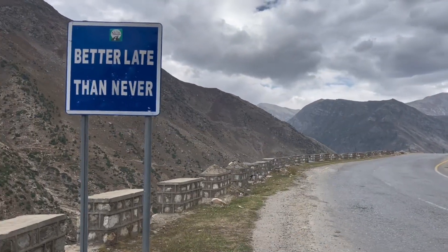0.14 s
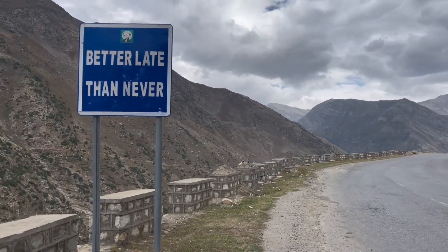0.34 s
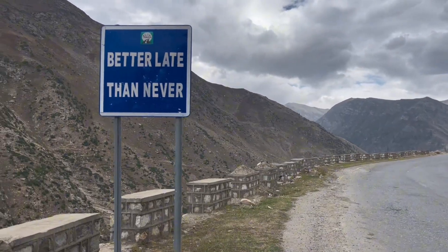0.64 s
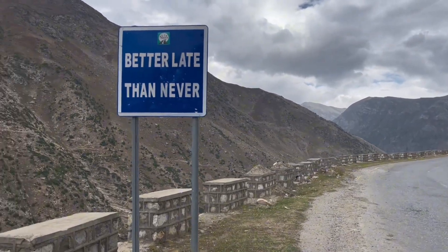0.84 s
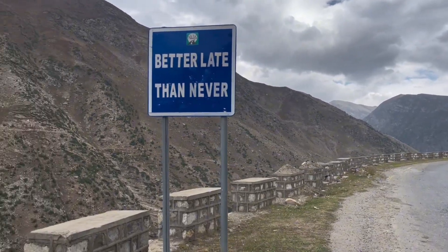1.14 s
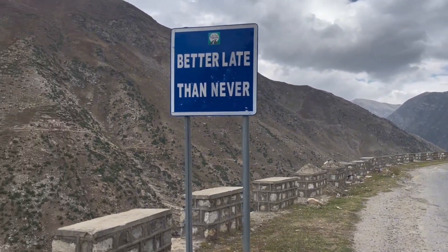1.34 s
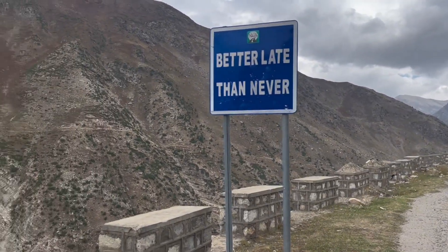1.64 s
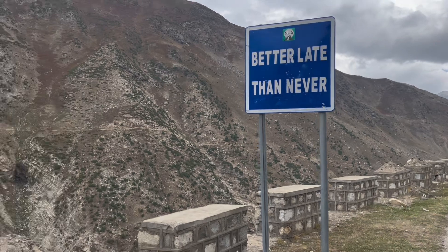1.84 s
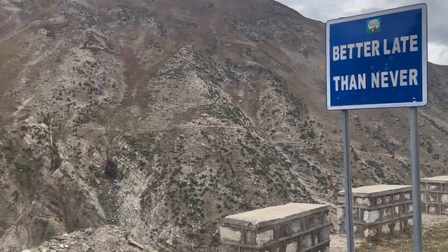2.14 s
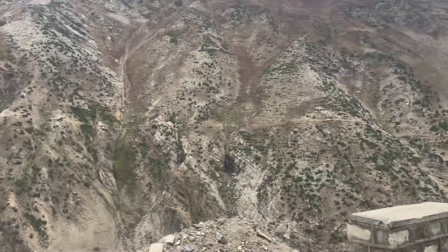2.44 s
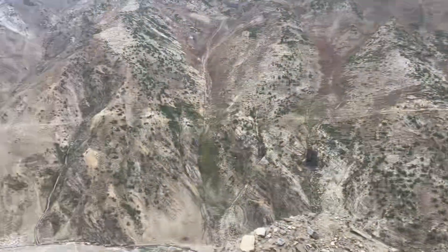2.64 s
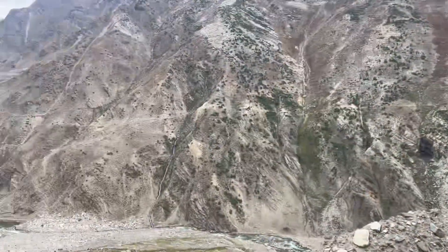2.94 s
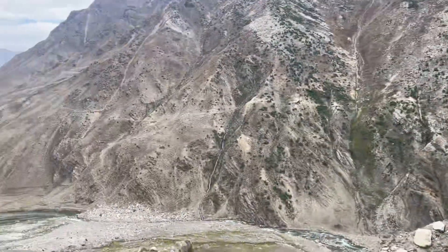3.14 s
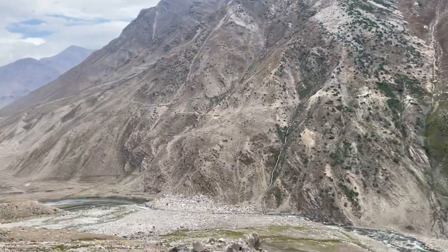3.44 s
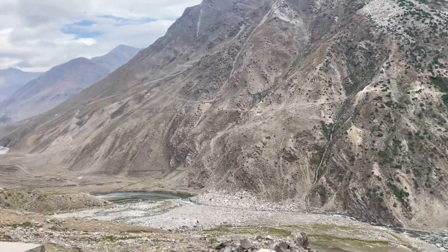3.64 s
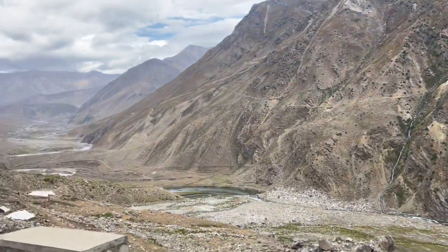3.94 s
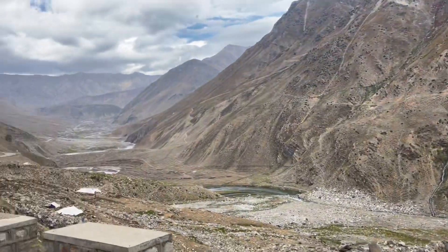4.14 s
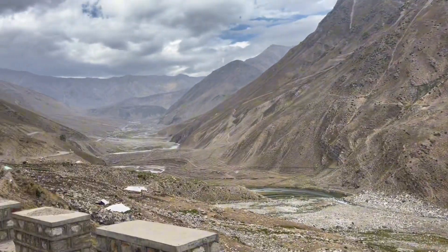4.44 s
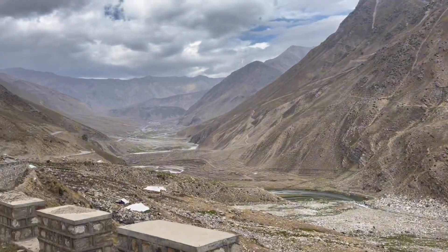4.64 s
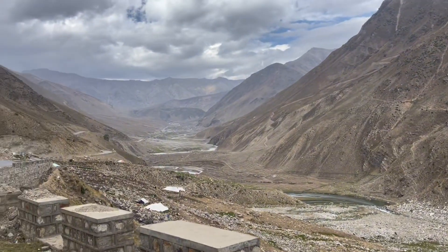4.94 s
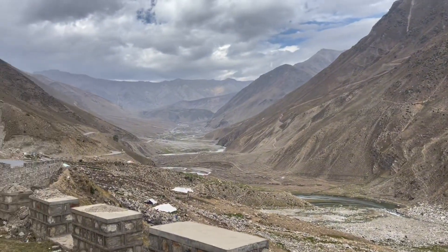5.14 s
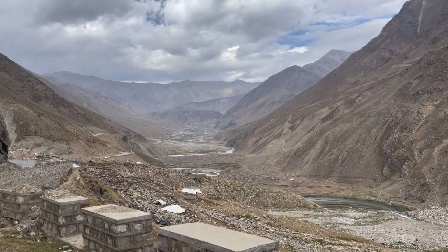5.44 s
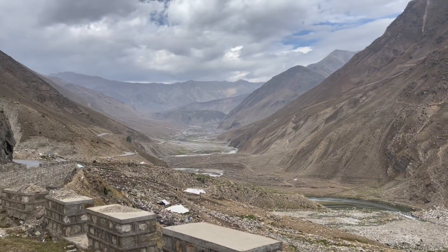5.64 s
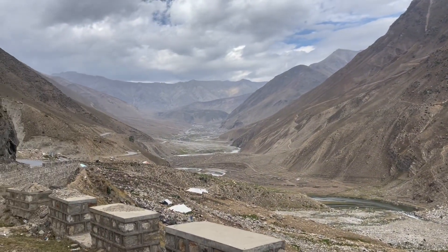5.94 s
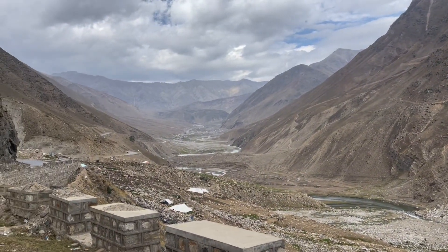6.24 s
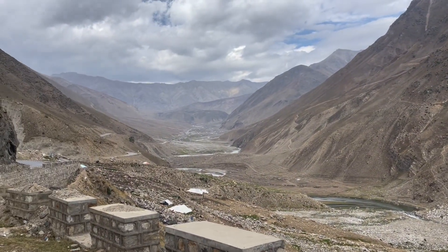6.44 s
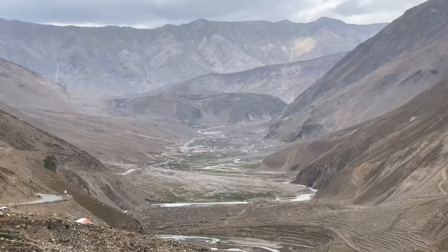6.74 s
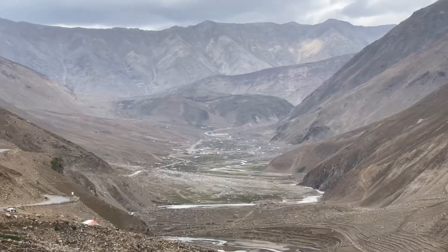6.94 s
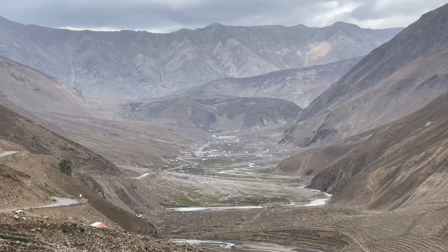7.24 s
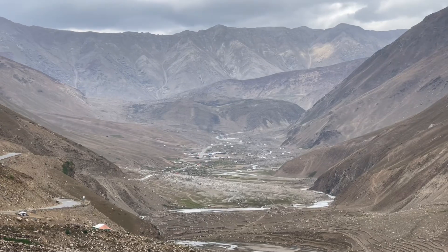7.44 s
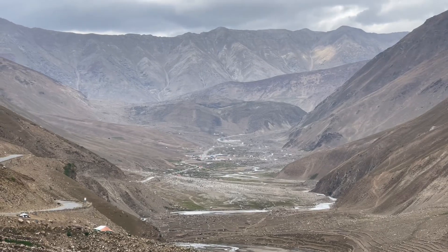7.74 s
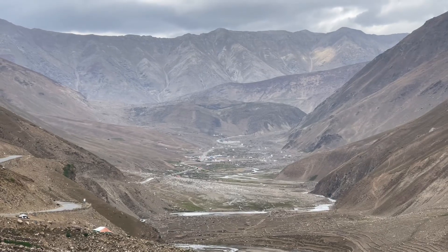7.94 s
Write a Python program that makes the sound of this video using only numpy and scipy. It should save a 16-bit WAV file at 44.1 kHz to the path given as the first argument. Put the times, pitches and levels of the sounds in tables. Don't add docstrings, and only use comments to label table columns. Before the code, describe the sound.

Close handheld stereo of a motorcycle idling outdoors: soft, bassy exhaust beats follow sharp valve clacks that ring the tank and casing, with fine chattering metal between. The rhythm wanders and stumbles slightly, and the thump weakens in places. Low wind flutters throughout, with clusters of dull buffets near the middle and end. The clatter briefly brightens around four seconds, then recedes as the microphone faces away.

```python
import sys
import numpy as np
from scipy import signal
from scipy.fft import rfft, irfft, next_fast_len
from scipy.io import wavfile

SR = 44100
rng = np.random.default_rng(int(sys.argv[2]) if len(sys.argv) > 2 else 0)


def natural_amplitude(level_db):
    exponent = np.asarray(level_db, float) / 20
    return 10 ** exponent


def wav_record(signal):
    frames = np.transpose(np.atleast_2d(signal))
    bounded = np.clip(frames, -1, 1)
    quanta = np.round(bounded * 32767).astype(np.int16)
    wavfile.write(sys.argv[1], SR, quanta)


N = 356328


def rms_one(x):
    return x / np.sqrt(np.mean(x ** 2) + 1e-20)


def in_time(rows):
    s, *columns = np.transpose(rows)
    return [np.interp(np.arange(N) / SR, s, column) for column in columns]


def drift(rate):
    r = np.exp(-40 * np.pi * rate / SR)
    slow = signal.lfilter([1], [1, -2 * r, r * r], rng.standard_normal(N // 20 + 2002))[2000:]
    return np.interp(np.arange(N) / 20, np.arange(len(slow)), rms_one(slow))


def band_noise(order, low, high):
    band = signal.butter(order, [low, high], "band", fs=SR, output="sos")
    return signal.sosfilt(band, rng.standard_normal((2, N)))


def resonate(x, hz, width):
    r = np.exp(-np.pi * width / SR)
    poles = [1, -2 * r * np.cos(2 * np.pi * hz / SR), r * r]
    return signal.lfilter([(1 - r * r) / 2, 0, (r * r - 1) / 2], poles, x)


def clicks(times, level_db):
    at, out = np.round(np.asarray(times) * SR).astype(int), np.zeros(N)
    keep = (at >= 0) & (at < N)
    out[at[keep]] = (natural_amplitude(level_db) * np.ones(len(at)))[keep]
    return out


def bursts(times, level_db, rise, fall):
    t = np.arange(int(8 * fall * SR)) / SR
    shape = np.exp(-t / fall) * (1 - np.exp(-t / abs(rise)))
    return signal.oaconvolve(clicks(times, level_db), shape / shape.max())[:N]


def changes(times, rows):
    rows = np.array(rows)
    out = np.zeros((rows.shape[1] - 1, len(times)))
    out[:, np.abs(times[:, None] - rows[:, 0]).argmin(0)] = rows[:, 1:].T
    return out


# (time [s], turned away [0-1],
# treble lift as a port faces the engine [dB], shading by the hand [dB])
TURN = [(0, 0.17, -2.5, 0.3), (.55, 0.05, 0.6, -0.6), (1.5, 0.14, 0.1, -0.1), (2.14, 0.04, 2, 0.25),
        (3.1, 0.1, 2.5, -0.6), (3.97, 0.27, 3, 0), (4.06, 0.4, 7, 0.3), (4.2, 0.42, 7, 0.5),
        (4.32, 0.5, 4.5, -0.1), (4.52, 0.62, 6, 0), (4.7, 0.75, 4, -0.5), (5.6, 0.91, 1.5, -0.3),
        (6.5, 1, 0.5, -4), (7.25, 0.99, 0, -4.5), (8.1, 1, -1.5, -3.5)]


def turning():
    away, lift_db, shade_db = in_time(TURN)
    return np.clip(away, 0, 1), lift_db, shade_db


# (frequency [Hz], level [dB per Hz])
WIND = [(20, -32.5), (45, -0.5), (70, 0.5), (110, 1), (170, -14.5), (260, -9), (320, -7), (420, -31),
        (700, -41)]
# (time [s], level [dB])
GUSTS = [(0.0, -30), (.18, -36), (1.1, -28), (1.4, -29), (2.5, -25), (2.85, -26.5), (3.2, -19), (3.9, -33),
         (4.35, -38.5), (4.64, -24.5), (4.82, -33.5), (5.1, -26), (5.3, -34), (5.92, -23.5), (6.5, -38.5),
         (6.88, -22), (7.36, -36), (8.08, -35)]
# (time [s], change [dB])
FLUTTERING = [(0, 2), (.6, 0.5), (.8, 0.5), (1.3, -2), (1.7, -1), (2.0, 3), (2.28, -4), (2.6, 2.5),
              (2.9, 2), (3.1, -4.5), (3.5, 3.5), (4.3, 0.8), (4.85, 3), (5.4, 2.4), (6.2, -0.5), (7.0, 0.5),
              (7.5, -3), (8.1, -0.5)]


def wind():
    rumble, flutter = np.zeros((2, N)), np.zeros((2, N))
    lumps, edges = drift(14), 20 * 2 ** np.arange(0, 5.1, .5)
    away = turning()[0]
    white = rng.standard_normal((2, 2, N))
    hz, level_db = np.transpose(WIND)
    for k, (low, high) in enumerate(zip(edges, edges[1:])):
        band = signal.butter(2, [low, high], "band", fs=SR, output="sos")
        mid, side = signal.sosfilt(band, white[k % 2])
        upper = low > 200
        lump_db = (2.5 * lumps + 2.5 * drift(20)) * (.6 if upper else 1)
        gain = natural_amplitude(np.interp(np.log(low * high) / 2, np.log(hz), level_db) + lump_db)
        if low < 50:
            gain = gain * natural_amplitude(-4.5 * away)
        layer = flutter if upper else rumble
        layer += gain * (mid + (.55 if upper else .63) * side * [[1], [-1]])
    rumble_db, = in_time(GUSTS)
    flutter_db = -36.5 + 0.27 * (rumble_db + 32) - 6 * away + in_time(FLUTTERING)[0]
    return natural_amplitude(rumble_db + 0.5) * rms_one(rumble) + natural_amplitude(flutter_db) * rms_one(flutter)


# (time [s], peak [dB], pitch [Hz], flutter [dB])
BUFFETS = [(1.696, -7, 122, -23), (2.411, -12, 222, -40), (2.462, -22, 136, -49), (2.511, -9, 156, -54),
           (2.779, -13.5, 126, -37), (2.841, -17, 164, -35), (2.996, -11.5, 134, -24),
           (3.092, -14.5, 156, -48), (3.223, -25, 147, -25), (3.317, -2.5, 148, -36),
           (3.428, -10.5, 146, -19), (3.468, -6, 223, -20), (3.527, -10, 195, -20.5),
           (3.552, -11.5, 146, -31), (3.622, -13.5, 167, -29), (3.704, -13, 204, -21.5),
           (4.485, -16, 149, -25.5), (5.185, -15, 154, -29), (5.921, -16, 235, -18.5),
           (6.043, -13.5, 196, -21), (6.174, -8.5, 131, -35), (6.194, -7, 163, -38),
           (6.245, -13.5, 242, -30), (6.264, -17.5, 224, -22), (6.498, -17.5, 222, -25),
           (6.719, -12.5, 166, -11), (6.88, -9.5, 167, -25), (7.008, -8.5, 165, -24),
           (7.173, -13, 214, -17), (7.309, -19, 178, -22.5)]
# (time [s], peak [dB], pitch [Hz])
WISPS = [(2.348, -11, 95), (2.393, -25.5, 260), (2.73, -17.5, 195), (2.752, -18, 146), (3.326, -8.5, 127),
         (3.674, -20, 228), (3.896, -19, 223), (4.17, -20.5, 260), (4.319, -19.5, 194), (4.746, -19, 250),
         (6.028, -17.5, 250), (6.387, -18, 190), (7.136, -18.5, 144)]


def buffets():
    eddies = BUFFETS + [(s, db, hz, db - 12.5) for s, db, hz in WISPS]
    out, chance = np.zeros((2, N + SR)), rng.uniform(-np.pi, np.pi, (len(eddies), 2))
    for (s, peak_db, hz, _), (phase, skew) in zip(eddies, chance):
        length = 1.124 / hz
        t = np.arange(int(2 * length * SR)) / SR
        turn = 2 * np.pi * hz * t * (1.3 - 0.15 * t / length) + phase
        port_skew = 0.62 * np.sin(skew) * np.array([[1], [-1]])
        swing = np.sin(turn + port_skew) * np.hanning(len(t))
        swing = swing + natural_amplitude(-16.5) * np.sin(2.595 * turn) * np.hanning(len(t)) ** 6
        at = int((s - length) * SR)
        out[:, at:at + len(t)] += swing * natural_amplitude(peak_db)
    s, _, _, ragged_db = np.transpose(eddies)
    mid, side = band_noise(4, 180, 430)
    ragged = rms_one(mid + 0.55 * side * [[1], [-1]])
    return out[:, :N] + ragged * bursts(s - .012, ragged_db - 7.5, 0.012, 0.012)


# (time [s], length of a cycle [ms])
CYCLE = [(0.05, 119.81), (0.42, 115.29), (1.01, 118.51), (1.5, 125.88), (1.98, 109.53), (2.88, 118.06),
         (3.24, 119.54), (3.72, 137.03), (4.08, 115.15), (4.67, 115.67), (5.61, 109.37), (6.42, 115.78),
         (7.54, 122.59), (7.91, 120.36)]
# (time [s], late [ms])
STUMBLES = [(0.42, 9.2), (0.89, 10.3), (1.38, 7.3), (1.98, -2.3), (2.77, 2.4), (3.0, -5.0), (3.47, -9.6),
            (3.58, -12.7), (3.84, -13.0), (3.96, -6.4), (4.32, 8.4), (4.44, -2.5), (4.92, 22.9),
            (5.04, 6.7), (5.26, -5.9), (5.39, 14.1), (5.72, 4.4), (5.84, 7.4), (5.96, 5.9), (6.3, 6.7),
            (6.66, 11.4), (6.79, 7.6), (7.16, 14.9), (7.29, 11.7), (7.42, 8.2), (7.67, 2.7)]


def crank():
    thumps, (at, late_ms) = [.0505], np.transpose(STUMBLES)
    for _ in range(68):
        due = thumps[-1] + np.interp(thumps[-1], *np.transpose(CYCLE)) / 1000
        thumps.append(due + late_ms[np.abs(at - due) < .05].sum() / 1000)
    cycle = np.diff(thumps, prepend=thumps[0] - .115)
    return np.array(thumps), thumps - (.0081 + .2265 * cycle)


def metal(modes, shake, strikes, spread, away):
    noise = rng.standard_normal((2, N))
    limits = [.8 * modes[0][0], min(1.3 * modes[-1][0], 12000)]
    band = signal.butter(2, limits, "band", fs=SR, output="sos")
    drive = signal.sosfilt(band, noise * shake + strikes * np.array([[1], [0]]))
    unit = np.std(sum(natural_amplitude(db) * resonate(noise[0, :SR], hz, w) for hz, w, db, _ in modes))
    rung = np.zeros((2, N))
    for k, (hz, width, db, turned_db) in enumerate(modes):
        rung += (-1) ** k * natural_amplitude(db + away * turned_db) * resonate(drive, hz, width)
    return rung * [[1], [spread]] / unit


# (frequency [Hz], phase ahead [rad])
PORTS = [
    ([(0, 0), (600, 2), (1300, 1), (2200, -1), (3500, 1), (4700, 5), (5400, 5), (6400, 3), (7100, 5), (7800, .7), (10000, 0)], [(0, 0), (300, -.5), (600, .2), (2100, -.4), (2900, 1.6), (4300, .2), (5200, .8), (6800, 0), (7400, 1.0), (8700, -.1), (10000, -2.5)]),
    ([(0, 0), (400, 0), (750, -9), (1300, -2.5), (2000, .5), (2900, 3), (4200, 2.2), (5700, 5.5), (7100, 3), (7800, -.5), (10000, -.5)], [(0, 0), (600, -1.6), (1200, -.8), (1900, -1.5), (2900, -3.3), (4400, -4.7), (4700, -5.3), (6700, -6.3), (8000, -6.0), (8900, -6.6), (10000, -9)]),
]


def ports(parts, away):
    direct, scattered = parts
    size = next_fast_len(N + 4096)
    hz, left = np.arange(size // 2 + 1) * SR / size, rfft(direct + scattered, size)
    heard = []
    for db, lead in PORTS:
        phase = np.exp(1j * np.interp(hz, *np.transpose(lead)))
        pose = natural_amplitude(np.interp(hz, *np.transpose(db))) * phase
        heard.append(irfft(left * pose, size)[:N])
    facing, turned = heard
    return np.array([(1 - away) * facing + away * turned, direct - scattered])


# (level [dB], change turned away [dB], share of the treble lift [1])
RATTLING = [
    (-39.5, -3.5, -0.31),
    (-49, 1, 0.089),
    (-64, 3.5, 0.56),
    (-65, -2.5, 0.83),
]


def rattle():
    away, lift_db, shade_db = turning()
    return [natural_amplitude(db + away * away_db + share * lift_db + shade_db) for db, away_db, share in RATTLING]


# (share of cycle [1], casing [dB], head [dB], fins [dB])
CONTACTS = [
    (-.008, -35.5, -3, 9.4),
    (.1, 0, -15, 2.7),
    (.54, 8.5, 0, 7.3),
    (0.59, 5, -9.5, 9.1),
    (-.115, 4.5, -14, 3.5),
]


def contacts(s, period, uneven):
    return [sum(bursts(s + row[j] * 0 + row[0] * period, row[j] + uneven[:, k], 0.0011, 0.0032)
                for k, row in enumerate(CONTACTS)) for j in range(1, 4)]


# (frequency [Hz], width [Hz], level [dB], change turned away [dB])
TANK = [(324, 45, -4, 8.5), (572, 123, -2, 1.5), (683.2, 55.4, 4.5, 3.5), (821, 131, -6.5, 9.5),
        (955, 246, -13, -4)]
# (share of cycle [1], level against a usual knock [dB])
TANK_TAPS = [
    (.13, -7.5),
    (.50, -4.5),
    (.58, -13.5),
    (.78, -23),
]


def tank(s, period, knock_db, shaking):
    away, _, shade_db = turning()
    at = np.minimum(s * SR, N - 1).astype(int)
    share, tap_db = np.transpose(TANK_TAPS)
    taps = (s[:, None] + share * period[:, None]).ravel()
    usual_db = (-29.5 - 8.5 * away + shade_db)[at, None]
    tap_db = (tap_db + 2.5 * rng.standard_normal((len(s), len(share))) + usual_db).ravel()
    taps, tap_db = np.append(s - 0.002493, taps), np.append(knock_db, tap_db)
    knock = bursts(taps, tap_db - 2.5, 0.004, 0.013)
    blows = sum(clicks(taps + k * 2 / 682, tap_db + 23.0) for k in range(3))
    chatter = (rng.random(N) < 90 / SR) * natural_amplitude(15.5 + 4.3 * rng.standard_normal(N))
    shake = shaking * natural_amplitude(3.5 + 0.63 * drift(60)) + knock
    return metal(TANK, shake, blows + shaking * chatter, 0.33, away), blows


# (frequency [Hz], width [Hz], level [dB], change turned away [dB])
CASING = [(1112, 119, 2, 3), (1630, 48, 4, -1), (1755, 45, 6.5, -7), (1815, 40, 1, -6), (2053, 900, -5, -6)]
COVER = [(2337, 36, 5.5, -2.5), (2650, 84, 3.5, -2), (2908, 40, 5, -6), (3063, 65, 5.5, -6),
         (3390, 90, -1, -2), (3270, 600, -8, -1.5)]
HEAD = [(3936, 65, 0, -4), (4200, 60, -2, 4), (4326, 60, 5, 7), (4620, 110, 4, -3), (4735, 45, 4.5, -3),
        (5160, 65, -2, 3), (5395, 55, -1, 0), (5755, 70, -2, 1)]
CHAIN = [(3790, 840, 3.5, 0.0041), (4850, 3000, -2.5, 0.0041)]
FINS = [(6100, 520, 3.1, -2), (7345, 390, 5, 1.5), (7630, 580, 7, 2.5), (9010, 3400, 1.8, 5.5)]
# (time [s], change of head tick [dB], tank knock [dB], casing burst [dB])
ODD_CLACKS = [(.02, -16, 0.5, -21.5), (.14, -2.5, -2.5, 3.5), (.38, 2, -2, 10.5), (.50, 7, 1.5, 8.5),
              (.97, -26, 0, -3), (1.33, -18, -2.5, -33), (1.46, 3, 1, 6.5), (1.59, 3, 4.5, 1),
              (2.28, 0, 3.5, 7), (2.85, 1, -1, -3), (3.2, 0, 2.5, 4), (3.68, -20, 4.5, 5),
              (4.05, 3.5, 1, 3), (4.29, -28, 3.5, 1.5), (4.40, 3.5, -2.5, 5), (4.63, -2, -8, -18),
              (4.89, -2, -5, 11.5), (5.12, 8.5, -3, -7), (5.23, 1.5, 6.5, -23), (5.35, 4, -5, 5),
              (5.58, -5, 2.5, -29), (5.69, 5.5, -16, 8.5), (5.92, 4.5, -1, 3), (6.27, -28, 4.5, -13),
              (6.75, -16, 2, 5.5), (6.99, 0.5, -17, 0.5), (7.12, 4.5, -3, 2), (7.25, 5.5, -1.5, 0),
              (7.50, -28, -9.5, 0), (7.99, -8, -0.5, 2), (.61, 2, 2, -1), (.85, -13, 4.5, -2),
              (1.09, -3, 3.5, 1), (1.21, -8, 2, 5.5), (2.05, -3.5, 2, 4), (2.39, 1.5, 1, -4),
              (2.5, 1.5, -1.5, 6), (2.73, 1, 1.5, 5.5), (2.96, 1, 1.5, 8), (3.08, -23, 0, 2),
              (3.32, 4, 3, 6), (3.93, 4, 2, 0), (4.17, -1, 2, -1), (5.01, 3, 1, 5), (5.46, 1.5, -1.5, 3),
              (6.04, -5, -0.5, 2), (6.15, 2.5, 0.5, 8.5), (6.5, 3.5, 0.5, 1), (6.62, -6, -5, 4),
              (7.38, -6.5, -1.5, 1)]
# (time [s], added ring as a share of the sound [1])
COVER_IN_VIEW = [(0, 0.66), (1.3, 0.34), (2.2, -0.25), (3.9, -0.32), (5, 0.28), (8.1, -0.22)]


def engine():
    s = crank()[1]
    period = np.append(np.diff(s), .12)
    away, lift_db, shade_db = turning()
    at = np.minimum(s * SR, N - 1).astype(int)
    tank_shake, casing, head, fins = rattle()
    tick_db, knock_db, burst_db = changes(s, ODD_CLACKS) + 1.2 * rng.standard_normal((len(s), 3)).T
    snap_db = 0.19 * np.maximum(tick_db, -20)
    tick_db = tick_db - 53.5 + (lift_db + shade_db)[at]
    knock_db = knock_db - 29.5 - 6.5 * away[at]
    uneven = rng.normal(0, 2.5, (len(s), len(CONTACTS)))
    on_casing, on_head, on_fins = contacts(s, period, uneven)
    burst = bursts(s + 0.0066, burst_db - 43.5, 0.0031, 0.0067)
    snap = casing * bursts(s - 0.0015, 8.0 + snap_db + 0.56 * uneven[:, 0], 0.00014, 0.0048)
    tick = bursts(s, tick_db + 0.5, 0.0001, 0.0097)
    drum, blows = tank(s, period, knock_db, tank_shake)

    shake = casing * (natural_amplitude(2.3 + 2.1 * drift(40)) + natural_amplitude(-17.0) * on_casing) + burst
    rest = metal(CASING, shake, natural_amplitude(-13) * blows, 0.45, away)
    shake = casing * (natural_amplitude(-3.0 + 1.5 * drift(28)) + natural_amplitude(-12.5) * on_casing) + snap
    rest += metal(COVER, shake, natural_amplitude(-36.5) * blows, 0.6, away)
    shake = head * (natural_amplitude(-7.5 + 1.7 * drift(40)) + on_head) + tick
    rest += metal(HEAD, shake, clicks(s, tick_db + 18.5), 0.49, away)
    shake = head * natural_amplitude(2.5 + 1.7 * drift(40)) + natural_amplitude(-7.0) * tick + natural_amplitude(-20.0) * snap
    rest += metal(CHAIN, shake, 0, 0.65, away)
    rest += metal(FINS, fins * (natural_amplitude(4.0 + 2.2 * drift(50)) + on_fins), 0, .26, away)
    rest = rest + in_time(COVER_IN_VIEW)[0] * resonate(rest, 2090, 260)
    return ports(drum + rest, away)


# (frequency [Hz], width [Hz])
PIPE = [
    (85.6, 27.4),
    (60.1, 12.9),
    (100.9, 16.5),
]
# (time [s], change [dB])
BURNS = [(.05, -3), (.29, -33), (.89, -3.5), (1.38, -8), (2.31, 0), (2.77, -5), (3.0, -3), (3.12, -6.5),
         (3.47, -1.5), (3.58, -8.5), (3.72, -10), (3.84, -11.5), (3.96, -8), (4.08, -8.5), (4.2, -12),
         (4.32, -4), (4.67, -3.5), (4.78, -15), (4.92, -6), (5.04, -2.5), (5.16, -4), (5.26, -18.5),
         (6.3, -33), (6.42, -7), (6.53, -12.5), (7.02, -16), (7.16, -21), (7.29, -8), (7.42, -4.5),
         (8.03, 2)]
# (time [s], left over right [dB])
PIPE_SIDE = [(0, 0), (.7, -1.3), (1.2, -3.5), (1.8, 0), (2.3, -0.5), (3.2, -0.5), (4.7, 0), (5.7, 0),
             (6.3, .5), (7.2, -.5), (8.1, -1.5)]


def exhaust():
    s = crank()[0]
    thump_db = -9 - 0.74 * rng.standard_normal(len(s)) + changes(s, BURNS)[0]
    pulse = np.pad(-np.hanning(44), (0, SR // 4))
    shape = pulse
    for hz, width in PIPE:
        shape = resonate(shape, hz, width)
    tip = resonate(resonate(np.roll(pulse, 120), 140, 50), 140, 50)
    shape = shape / np.abs(shape).max() + natural_amplitude(-14.0) * tip / np.abs(tip).max()
    lag_s = 0.00066
    thumps = np.array([signal.oaconvolve(clicks(s + side * lag_s, thump_db), shape)[:N]
                       for side in (-.5, .5)])
    thumps = thumps * natural_amplitude(in_time(PIPE_SIDE)[0] * [[.5], [-.5]])
    puff = rms_one(band_noise(2, 80, 210))
    return thumps + puff * bursts(s, thump_db - 21, .015, .014)


def scene():
    return wind() + buffets() + engine() + exhaust()


def low_pass(x):
    return signal.sosfilt(signal.butter(12, 12300, fs=SR, output="sos"), x)


def record(dry):
    cut = signal.sosfilt(signal.cheby1(10, .5, 9250, fs=SR, output="sos"), dry)
    cut = signal.sosfilt(signal.butter(2, 28, "high", fs=SR, output="sos"), cut)
    cut = cut / (1 + np.abs(cut / .72) ** 4) ** .25
    bass = signal.sosfilt(signal.butter(4, 260, fs=SR, output="sos"), cut)
    cut = cut + bass * natural_amplitude(-65) * np.cos(2 * np.pi * 12000 * np.arange(N) / SR)
    return low_pass(cut)


dry = scene()
out = record(dry)
wav_record(out)
```